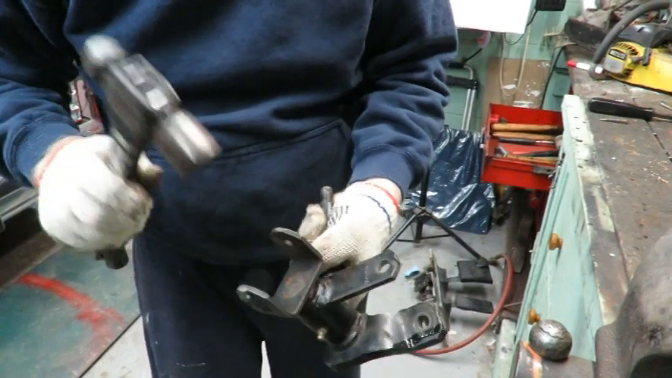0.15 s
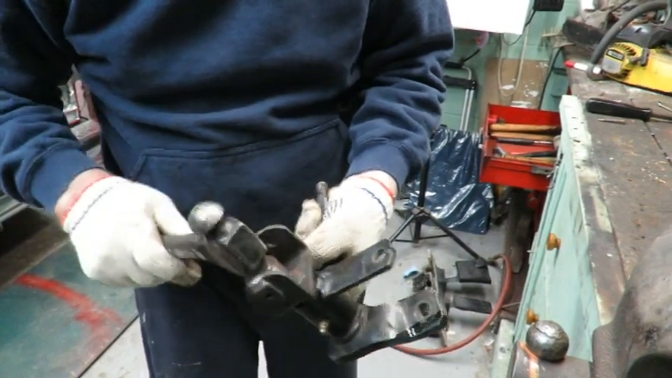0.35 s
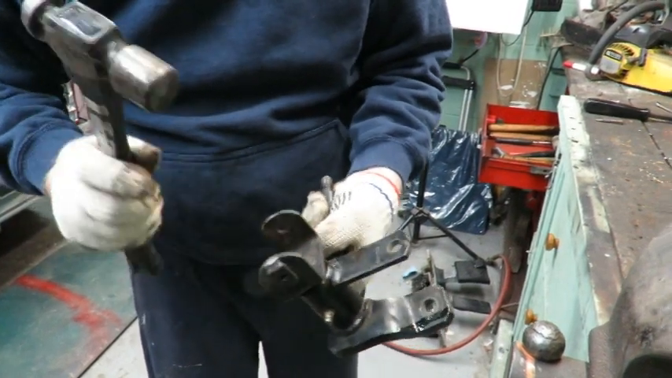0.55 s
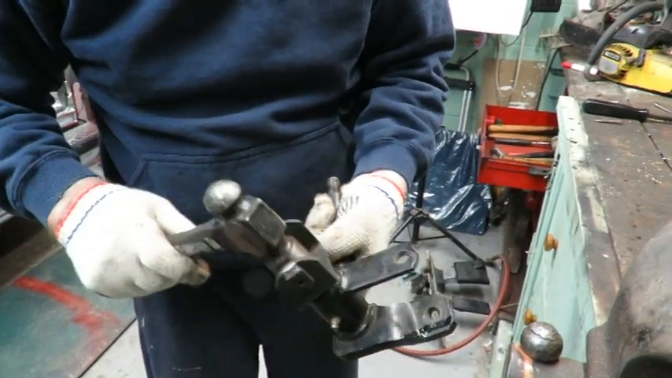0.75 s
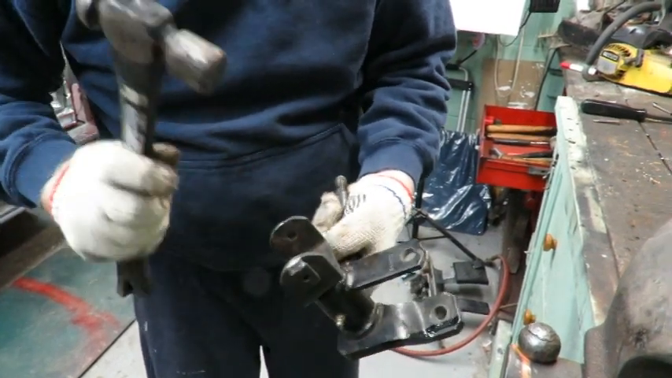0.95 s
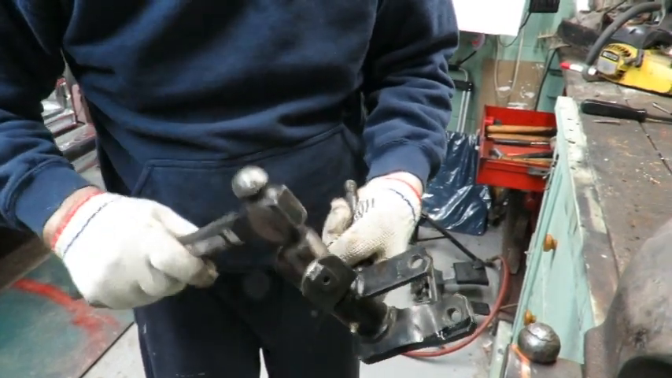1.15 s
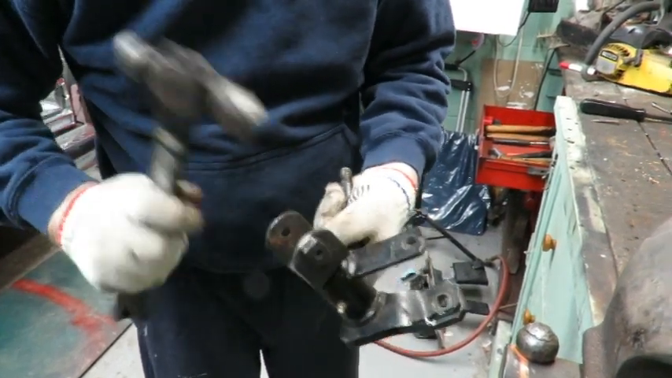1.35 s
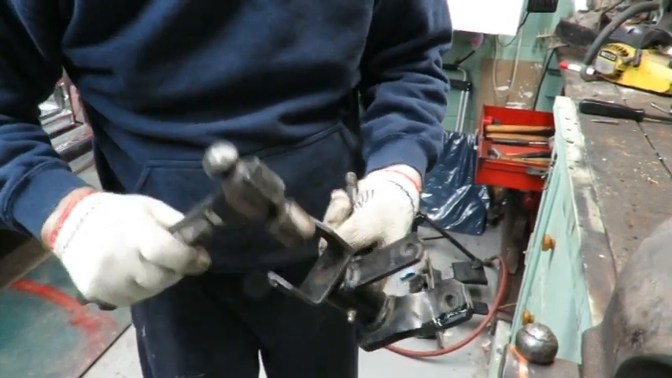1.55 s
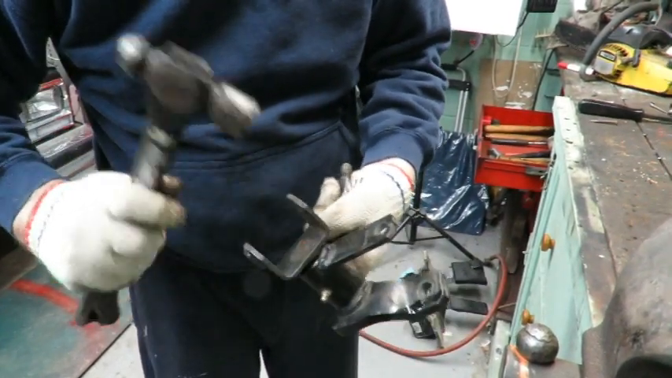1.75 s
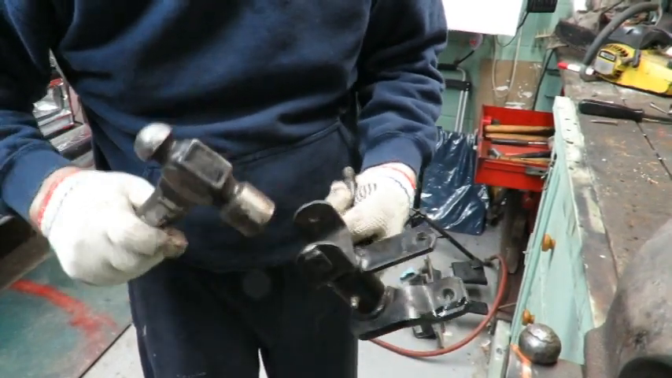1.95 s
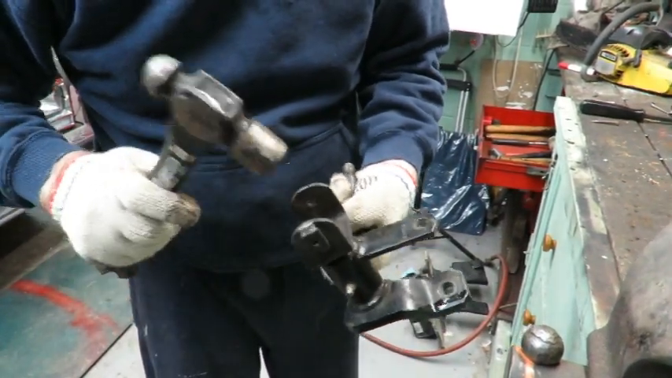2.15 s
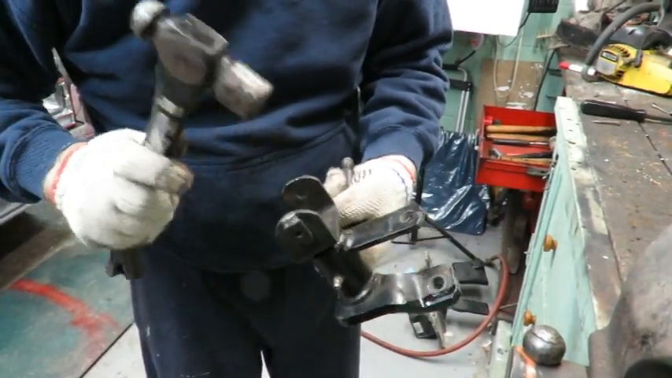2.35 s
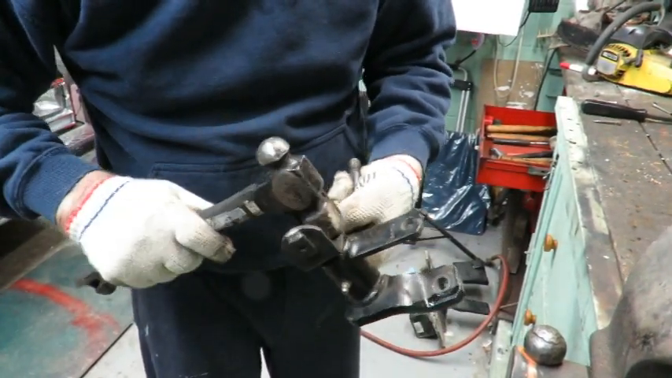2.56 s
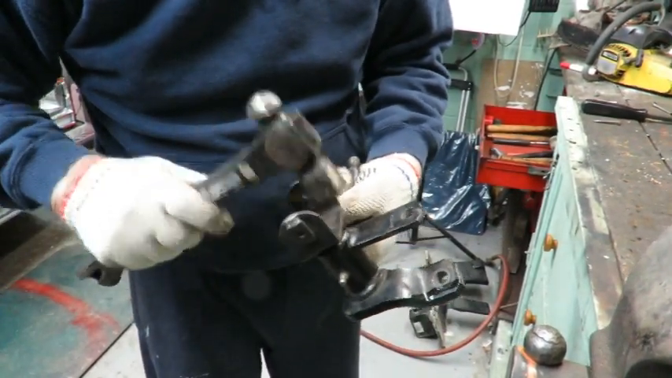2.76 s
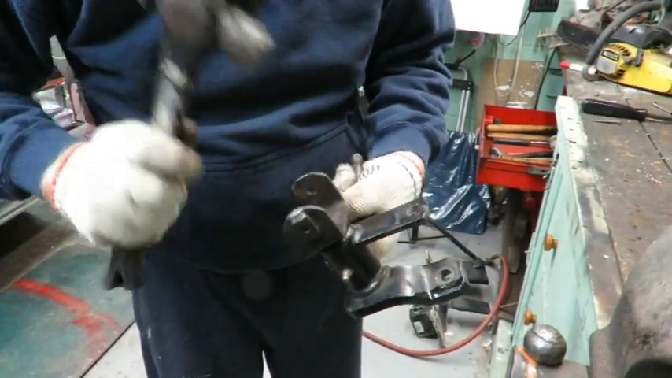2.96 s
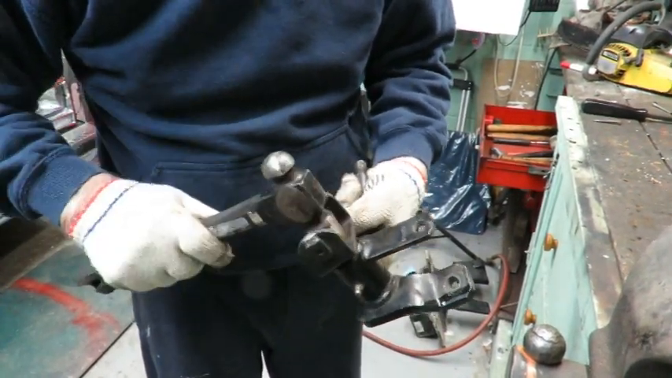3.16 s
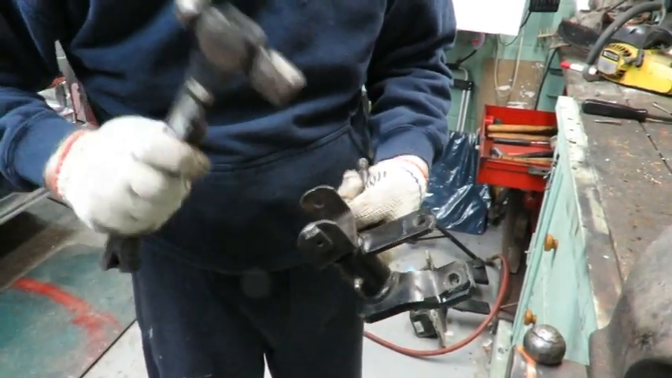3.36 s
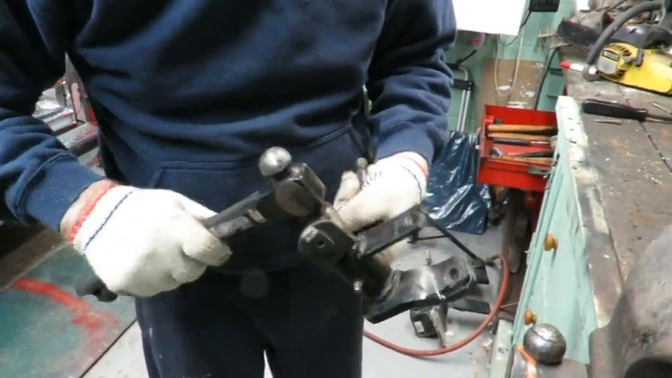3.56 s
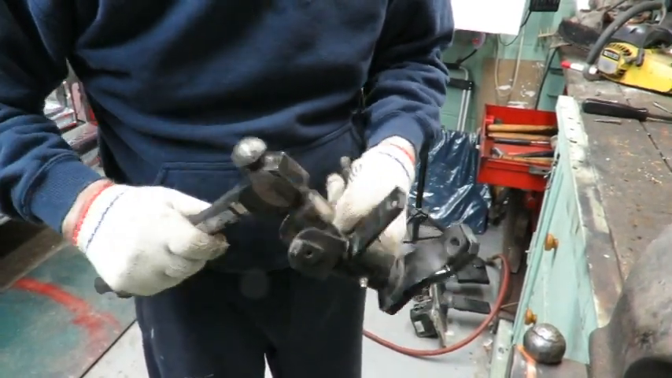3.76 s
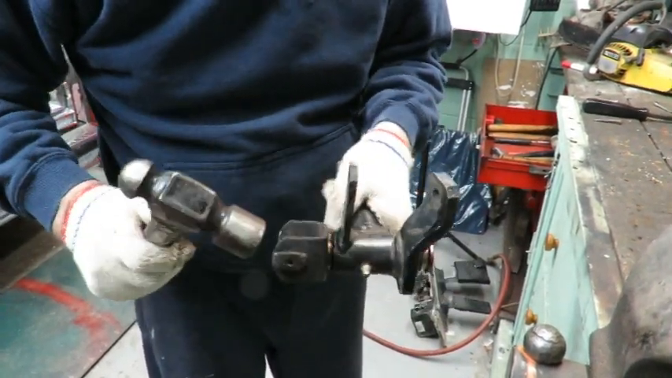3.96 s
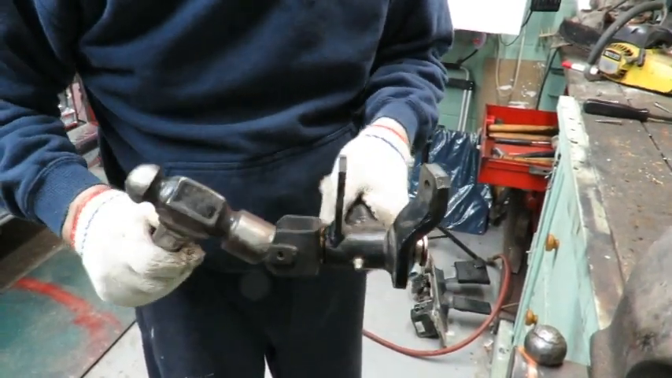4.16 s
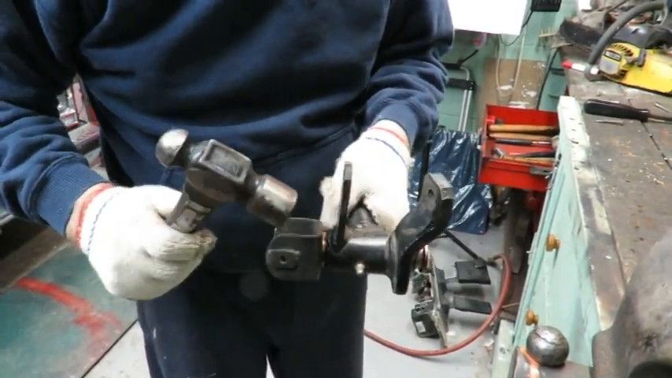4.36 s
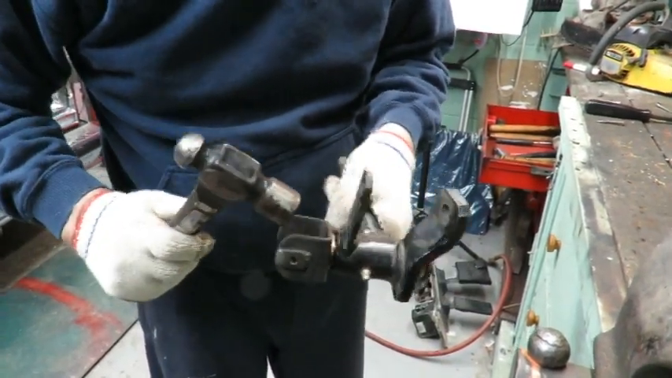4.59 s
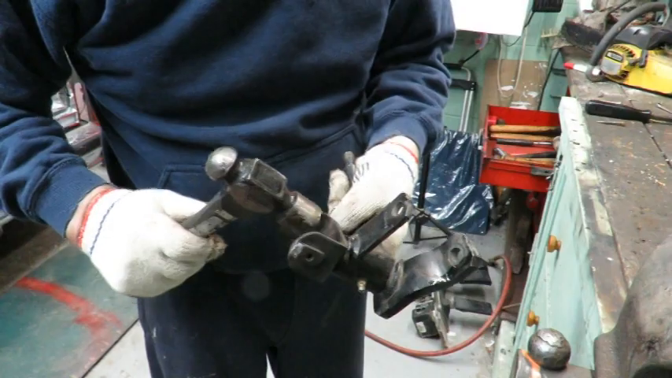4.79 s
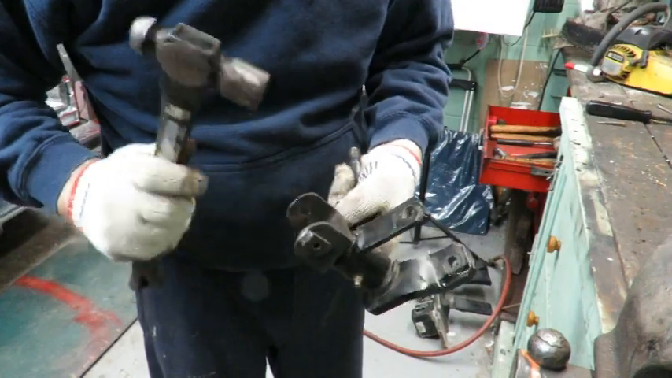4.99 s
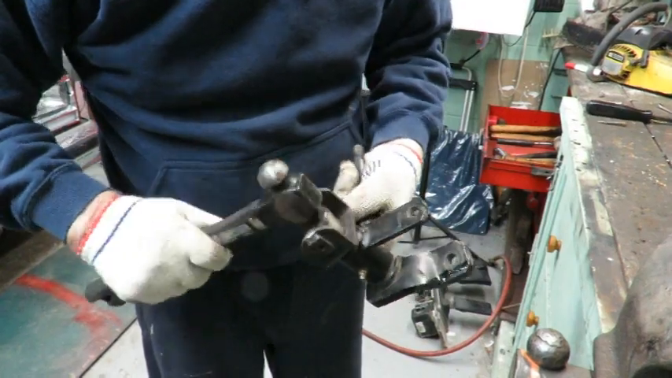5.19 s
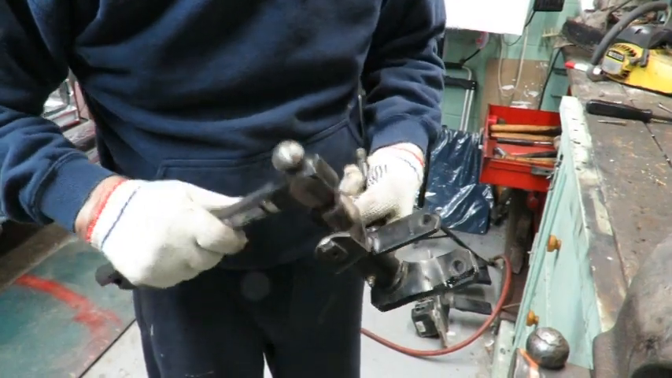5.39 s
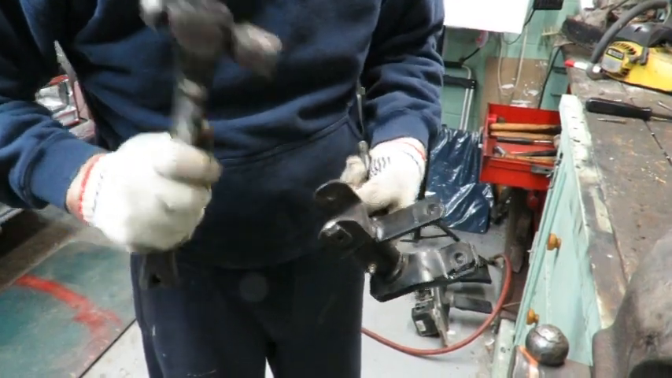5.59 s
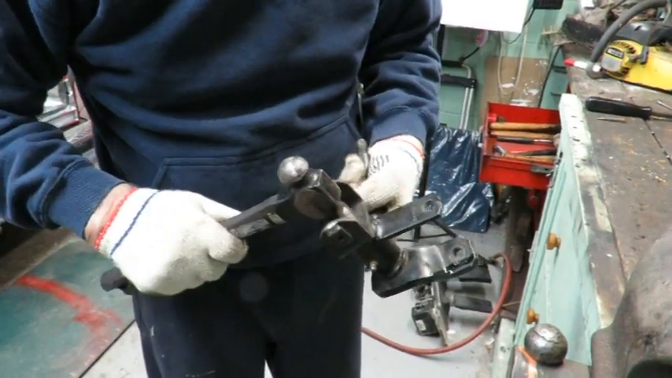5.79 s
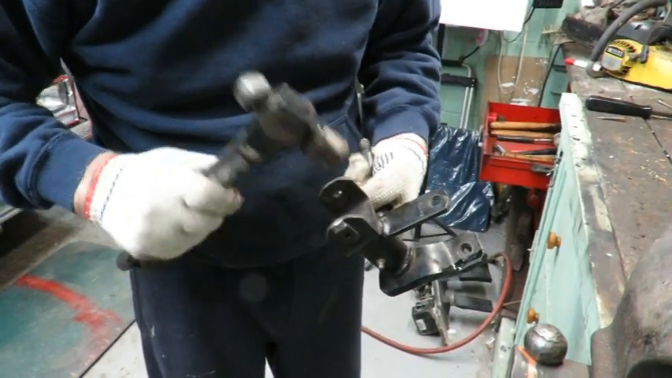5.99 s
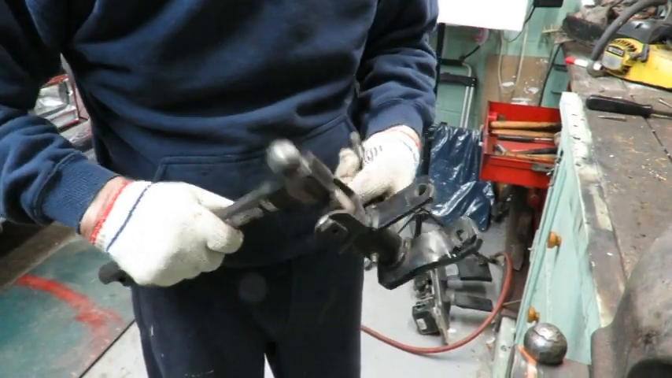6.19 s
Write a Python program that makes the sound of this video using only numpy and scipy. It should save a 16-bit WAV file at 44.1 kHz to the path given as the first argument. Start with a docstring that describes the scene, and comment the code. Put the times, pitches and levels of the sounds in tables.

```python
"""A ball-peen hammer drives a steel bushing into a hand-held bracket in a small workshop; twice it just taps.
A blow is a crack and a clang of shaped noise, plus steel modes: resonators driven by noise that dies away.
A tap is a dull noise click that sets off a small ping. The workshop's low rush is steady coloured noise.
The close recorder overloads with a pop (a short swing and a noise splutter), turns its gain down,
and lets the room noise creep back up between blows."""
import sys
import numpy as np
from scipy import signal
from scipy.io import wavfile

SR = 44100
rng = np.random.default_rng(int(sys.argv[2]) if len(sys.argv) > 2 else 0)


def master_out(mix):
    """Clip the mix to full scale and print it as 16-bit PCM to the path in sys.argv[1]."""
    frames = np.transpose(np.atleast_2d(mix))
    ceiling = np.clip(frames, -1, 1)
    pcm = np.round(ceiling * 32767).astype(np.int16)
    wavfile.write(sys.argv[1], SR, pcm)


N = 274875   # samples in the scene
BLOW_SIZE = 20000   # samples that a blow lasts

# hammer contacts, with grazes and rebounds; the first still rings as the scene opens:
# (time [s], force [dB], crack over force [dB], clang tilt [dB per octave], free ring [dB],
#  landing spot along the part [0-1], overload pop [dB]); a pop near -50 is practically none
BLOWS = [(-0.27, 14.5, 0, 0.5, 1.5, .42, -50), (0.0859, 7, 5, 0.5, -8, 0.26, -7),
         (0.0913, -2.5, 7.5, 4, -9, 0.59, -16), (0.4128, 1.5, -5, 0.5, -4, .55, -59),
         (0.4221, 7.5, -0.5, 0, 2.5, 0.25, -55), (0.443, -6, -15.5, 6.5, -2.5, 0, -48),
         (0.7679, 10, -3.5, 5, 3.5, .41, -48.5), (1.1599, 9.5, 1, 2.7, 0.1, 0.38, -9),
         (1.1751, -4.5, 4.5, 1, -5.5, 0.45, -13), (1.5256, -8, -6.5, 1, -6.5, 0.86, -46),
         (1.5305, 7, 4.5, -2.5, -2.6, 0.5, -15), (1.9365, 4, -8, 1.7, -9.5, 0.6, -55),
         (2.6052, 8.5, -5.5, 2, 5, 0.78, -14.5), (3.1405, 11, -4, 3.1, 2.5, 0.28, -11),
         (3.6371, 10.5, -0.5, 2.5, 5.5, 0.48, -8), (5.2344, 9.5, -5.5, 4, 3.5, 0.63, -8.5),
         (5.7881, 12.5, -5, 3.5, 3, 0.77, -4)]
# groups of steel modes that are struck together, by name: (frequency [Hz], level [dB], t60 [s]);
# t60 is the time to fall by 60 dB
MODES = { "bracket": [(1122, 0, .16), (1290, -11, .15), (2024, -6, .16), (2451, -4, .12), (2965, -6, .1),
         (3055, -2, .08), (3425, -6, .1), (3636, -7, .12), (4975, -5, .2)], "main ring": [(4245, 0, .11),
         (4300, -13, .06), (5330, -17, .18)], "bright ring": [(6104, 0, .14), (5588, -6, .18)],
         "upper ring": [(6460, 0, .17), (7116, -9, .06)], "ping": [(8458, -1, .1), (8560, -4, .14)],
         "zing": [(10535, 0, .06), (14247, -19, .1)], "shimmer": [(11555, 0, .06), (13550, -10, .04)], }
# each group is a standing wave along the part, loud when struck at its belly and weak at its node:
# (level [dB], share of the free ring [dB per dB], waves along the part [count],
#  spot of the belly [part lengths], swing [dB])
MODE_SHAPES = { "bracket": (-13.5, .12, 1.82, .6, 5.5), "main ring": (3.3, 1, .83, 1.11, 3.8),
               "bright ring": (-8.3, .25, 1.76, .31, 8.8), "upper ring": (-8.8, .18, 1.32, .37, 6.2),
               "ping": (-12.7, .96, 1.35, .54, 5), "zing": (-2.5, -.1, 1.33, .28, 5),
               "shimmer": (-8.2, .16, .6, .65, 7), }
# colour of the first contact: (frequency [Hz], level [dB per Hz])
CRACK_COLOUR = [(30, -60), (120, -31), (500, -14), (1100, 8.5), (2000, -2.5), (3200, 5.5), (6000, -5.5),
                (8500, -5.5), (12000, -4.5), (14500, -14.5), (17000, -29.5)]
# colour of the dense high modes after it: (frequency [Hz], level [dB per Hz])
CLANG_COLOUR = [(30, -50), (120, -29.5), (350, -18), (750, -21), (1200, 0.5), (2000, 4.5), (3200, 2.5),
                (5000, 0), (7000, -3), (9500, -4.5), (12000, -8.5), (14000, -23.5), (16500, -39)]
# how long the workshop echoes: (frequency [Hz], t60 [s])
ROOM_T60 = [(150, 0.14), (1000, .42), (3000, 0.4), (5000, 0.41), (8000, 0.1), (11000, 0.28), (15000, 0.26)]
# how alike left and right are in the echoes: (frequency [Hz], likeness [0 unrelated, 1 the same])
ECHO_LIKENESS = [(60, 0.59), (300, 0.33), (1400, 0.93), (3100, 0.16), (4300, 1), (6800, 0.25),
                 (15000, 0.33)]
# the same for the crack and the tap click: (frequency [Hz], likeness [0-1])
CRACK_LIKENESS = [(100, .9), (1000, 0.37), (4000, 1), (8000, 0.18), (15000, 0.21)]
# the same for the room noise: (frequency [Hz], likeness [0-1])
FLOOR_LIKENESS = [(60, 1), (130, 0.68), (300, 0.01), (700, 0.94), (1400, 0.51), (3100, 0), (7000, 0.22)]
# colour of the room noise: (frequency [Hz], level [dB per Hz])
FLOOR_COLOUR = [(15, -49), (25, -23.5), (74, -3), (114, -14.5), (180, 2.5), (236, -5), (394, -7.5),
                (439, -5.5), (624, -12), (1190, -14.5), (16000, -49.5)]
# the hammer head settles on the bracket: (time [s], level [dB], click [dB], treble modes [dB])
TAPS = [(3.9027, -15.5, -1.5, -10), (6.0650, -27, 12.5, 10)]
# the bracket's ring under such a soft touch: (frequency [Hz], level [dB], t60 [s])
TAP_MODES = [(1130, -2, .16), (2024, 0, .2), (2955, -8, .1), (4240, -9, .2), (10535, -18, .07),
             (11555, -17, .07)]
# colour of the tap click: (frequency [Hz], level [dB per Hz])
TAP_CLICK_COLOUR = [(150, -22), (700, -6), (2000, 0), (3000, -3.5), (6000, -14.5), (12000, -26),
                    (16000, -40)]

# half-octave filters: (centre [Hz], filter)
EDGES_HZ = 24 * 2 ** (np.arange(20) / 2)
BANDS = [(np.sqrt(lo * hi), signal.butter(2, [lo, hi], "band", fs=SR, output="sos"))
         for lo, hi in zip(EDGES_HZ, EDGES_HZ[1:])]

# levels of the layers, before the recorder's gain control
RING_DB, CRACK_DB, CLANG_DB, FLOOR_DB = 8, 13.5, 11, -54.5
CLANG_TOP_HZ, RECORDER_TOP_HZ = 14200, 17600
# a freely ringing blow holds the microphone in overload longer: its pop is deeper and splutters more
POP_HZ, POP_FALL_OCTAVES_PER_DB, POP_DELAY_S = 437, 0.09, 0.0007
SPLUTTER_DB, SPLUTTER_RING_SHARE = -4, 0.47


def from_db(db):
    """Turn decibels into a gain."""
    return 10 ** (np.asarray(db) / 20)


def at_hz(points, hz):
    """Read a table between its points, on a log-frequency axis."""
    freqs, values = np.transpose(points)
    return np.interp(np.log(hz), np.log(freqs), values)


def unit_energy(x):
    """Scale a stereo sound to an energy of one per channel, on average."""
    return x / np.sqrt(np.sum(x ** 2) / 2 + 1e-20)


def fade(t60):
    """Exponential decay over the length of a blow."""
    return np.exp(-np.log(1000) * np.arange(BLOW_SIZE) / (SR * t60))


def add(out, s, sound):
    """Mix a sound in at time s; what lies outside the scene is cut off."""
    start = round(s * SR)
    sound, start = sound[:, max(-start, 0):], max(start, 0)
    out[:, start:start + sound.shape[1]] += sound[:, :N - start]


def noise_bands(likeness, size):
    """Stereo noise split into bands, each mixed from a shared part and an opposite part: (Hz, noise)."""
    bands = []
    white = rng.standard_normal((2, 2, size))
    for k, (hz, sos) in enumerate(BANDS):
        # neighbouring bands take turns between two separate noises
        mid, side = signal.sosfilt(sos, white[k % 2])
        alike = np.clip(at_hz(likeness, hz), -1, 1)
        shared = np.sqrt(1 + alike) * mid
        opposite = np.sqrt(1 - alike) * side * [[1], [-1]]
        bands.append((hz, shared + opposite))
    return bands


def coloured(bands, spectrum):
    """Add up noise bands, each at its level in the colour table."""
    return sum(from_db(at_hz(spectrum, hz)) * band for hz, band in bands)


def ring(x, hz, t60):
    """One steel mode: a resonator driven by x that swings at hz and dies away."""
    r = from_db(-60 / (t60 * SR))   # shrink per sample
    w = 2 * np.pi * hz / SR   # turn per sample
    return signal.lfilter([0, np.sin(w)], [1, -2 * r * np.cos(w), r * r], x)


def reflections(bands, near_t60, near_db):
    """Quick echoes off bench and body, plus the workshop's tail with its own decay in each band."""
    near = from_db(near_db) * fade(near_t60)
    return [(hz, band * (near + fade(at_hz(ROOM_T60, hz)))) for hz, band in bands]


def mode_mix(ring_db, spot):
    """Level of each group of modes, from where the hammer lands and how freely the steel can ring."""
    return [db + share * ring_db + swing_db * np.cos(2 * np.pi * waves * (spot - belly))
            for db, share, waves, belly, swing_db in MODE_SHAPES.values()]


def blow(crack_db, tilt_db, group_dbs, crack_t60=0.0086, direct_db=0.5, clink_db=-1.5, clink_t60=0.059):
    """One contact of steel on steel; the part moves in the hand, so its echoes differ every time."""
    echoes = reflections(noise_bands(ECHO_LIKENESS, size=BLOW_SIZE), near_t60=0.16, near_db=8.5)

    # a squarer, shorter contact tips the clang towards the treble
    tipped = [(hz, db + tilt_db * np.log2(np.clip(hz, 700, 7000) / 2000)) for hz, db in CLANG_COLOUR]
    out = from_db(CLANG_DB) * unit_energy(coloured(echoes, tipped))

    # the modes reach the microphones directly and by way of the room
    path = unit_energy(sum(band for hz, band in echoes))
    path[:, 0] += from_db(direct_db)
    levels = dict(zip(MODES, group_dbs))
    for group, modes in MODES.items():
        for hz, db, t60 in modes:
            out += from_db(RING_DB + levels[group] + db) * unit_energy(ring(path, hz, t60))

    # a short clink lifts the start of the main mode while the steel is still pressed home
    impulse = np.ones((2, 1)) * signal.unit_impulse(BLOW_SIZE)
    main_hz = MODES["main ring"][0][0]
    clink = unit_energy(ring(impulse, main_hz, clink_t60))
    out += from_db(clink_db + levels["main ring"]) * clink

    # only the crack of the contact reaches the highest treble
    out = signal.sosfilt(signal.butter(14, CLANG_TOP_HZ, fs=SR, output="sos"), out)
    crack = coloured(noise_bands(CRACK_LIKENESS, size=2000), CRACK_COLOUR)
    crack = unit_energy(crack * fade(crack_t60)[:crack.shape[1]])
    add(out, 0, from_db(CRACK_DB + crack_db) * crack)
    return out


def hammering():
    """All contacts of the hammer; some blows graze the part first or rebound on it."""
    out = np.zeros((2, N))
    for s, force_db, crack_db, tilt_db, ring_db, spot, _ in BLOWS:
        add(out, s, from_db(force_db) * blow(crack_db, tilt_db, mode_mix(ring_db, spot)))
    return out


def room_noise():
    """The steady low rush of the workshop: noise that is strongest in the bass."""
    rush = unit_energy(coloured(noise_bands(FLOOR_LIKENESS, size=N), FLOOR_COLOUR))
    return from_db(FLOOR_DB) * np.sqrt(N) * rush   # sqrt(N) makes the level hold per sample


def pops(swell_cycles=0.41, low_cut_hz=55, splutter_t60=0.023):
    """An overloaded microphone swings for a cycle or two and splutters; the right one follows late."""
    out, t = np.zeros((2, N)), np.arange(BLOW_SIZE) / SR
    mids = signal.butter(2, [450, 1100], "band", fs=SR, output="sos")
    for s, *_, ring_db, spot, pop_db in BLOWS:
        start = s + POP_DELAY_S
        hz = POP_HZ * 2 ** (-POP_FALL_OCTAVES_PER_DB * max(ring_db, 0))
        age = t * hz / swell_cycles   # 1 where the swell is fullest
        swing = from_db(pop_db) * age * np.exp(1 - age) * np.sin(2 * np.pi * hz * t)
        add(out, start, swing * [[1], [0]])
        add(out, start + 0.42 / hz, 0.9 * swing * [[0], [1]])   # right: 0.42 of a cycle late
        # the first half is dropped so that the filter has settled
        noise = signal.sosfilt(mids, rng.standard_normal((2, 2 * BLOW_SIZE)))[:, BLOW_SIZE:]
        splutter = from_db(pop_db + SPLUTTER_DB + SPLUTTER_RING_SHARE * ring_db)
        add(out, start, splutter * noise / noise.std() * fade(splutter_t60))
    return signal.sosfilt(signal.butter(2, low_cut_hz, "high", fs=SR, output="sos"), out + 1e-18)


def taps(click_t60=0.018, room_db=-25.0, room_t60=0.34):
    """Light touches: a dull click with a faint room tail drives a few modes into a small ping."""
    out = np.zeros((2, N))
    for s, level_db, click_db, treble_db in TAPS:
        shape = fade(click_t60) + from_db(room_db) * fade(room_t60)
        noise = coloured(noise_bands(CRACK_LIKENESS, size=BLOW_SIZE), TAP_CLICK_COLOUR)
        click = unit_energy(noise * shape)
        ping = sum(from_db(db + treble_db * (hz > 2500)) * unit_energy(ring(click, hz, t60))
                   for hz, db, t60 in TAP_MODES)
        add(out, s, from_db(level_db) * (from_db(click_db) * click + ping))
    return out


def scene():
    """Hammering and taps over the room noise."""
    return hammering() + taps() + room_noise()


def gain_control(x, threshold_db=-13.5, release_db_per_s=8.0, attack_s=0.011):
    """Loud sound pulls the gain down within milliseconds; it recovers over seconds."""
    start_cut_db = 14.0   # still held down by earlier work
    power = signal.lfilter(np.ones(220) / 220, [1], np.mean(x ** 2, axis=0))   # 5 ms average
    over_db = np.maximum(10 * np.log10(power + 1e-12) - threshold_db, 0)
    # hold the deepest cut so far, less what has been recovered since
    recovered_db = release_db_per_s * np.arange(N) / SR
    held_db = np.maximum.accumulate(np.maximum(over_db + recovered_db, start_cut_db))
    cut_db = held_db - recovered_db
    r = np.exp(-1 / (attack_s * SR))
    smooth_cut_db = start_cut_db + signal.lfilter([1 - r], [1, -r], cut_db - start_cut_db)
    return x * from_db(-smooth_cut_db)


def record(dry):
    """Gain control, overload pops, clipping at full scale, and the top cut."""
    clipped = np.clip(gain_control(dry) + pops(), -1, 1)
    return signal.sosfilt(signal.cheby2(12, 60, RECORDER_TOP_HZ, fs=SR, output="sos"), clipped)


dry = scene()
out = record(dry)
master_out(out)
```